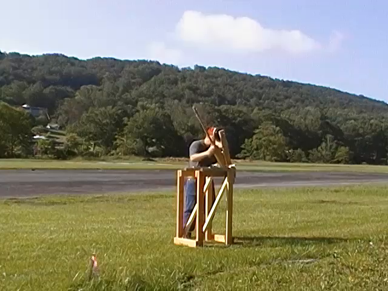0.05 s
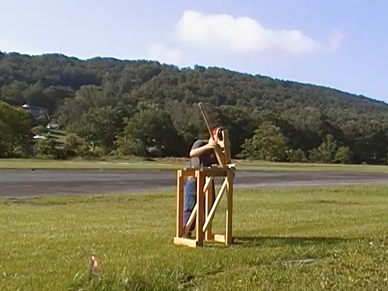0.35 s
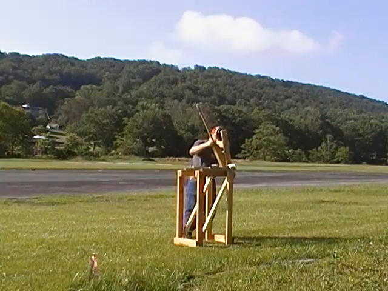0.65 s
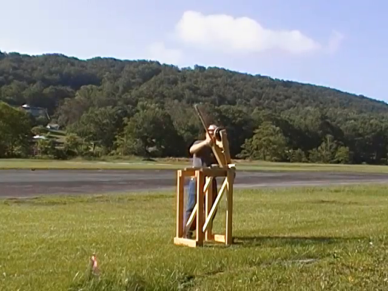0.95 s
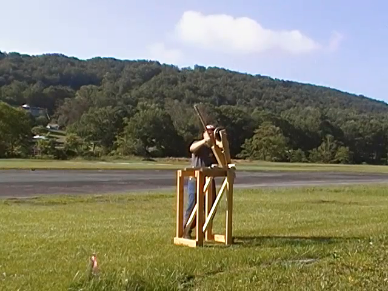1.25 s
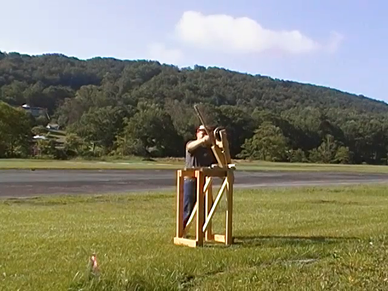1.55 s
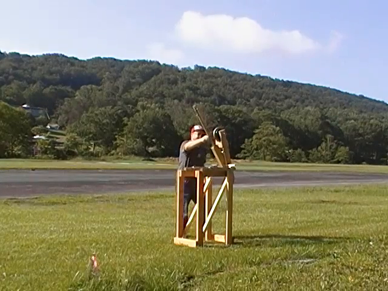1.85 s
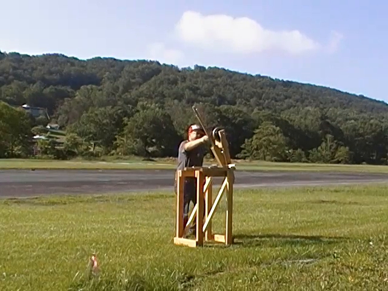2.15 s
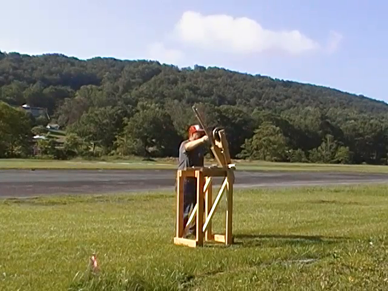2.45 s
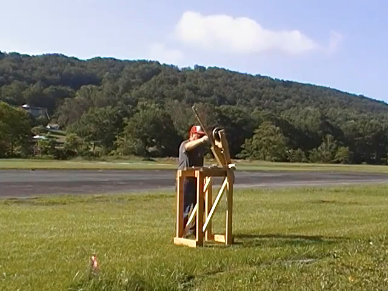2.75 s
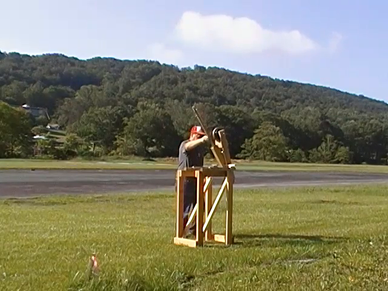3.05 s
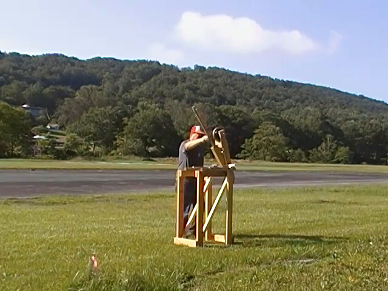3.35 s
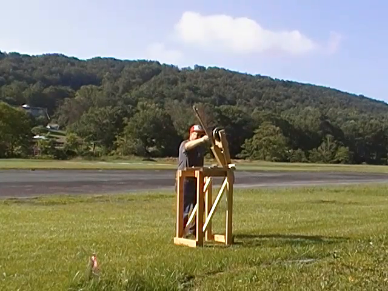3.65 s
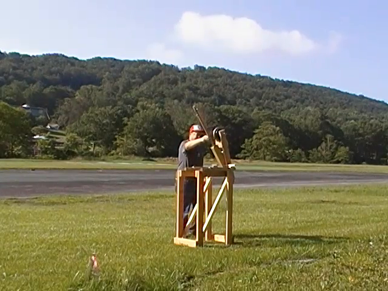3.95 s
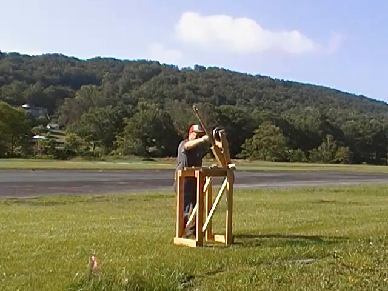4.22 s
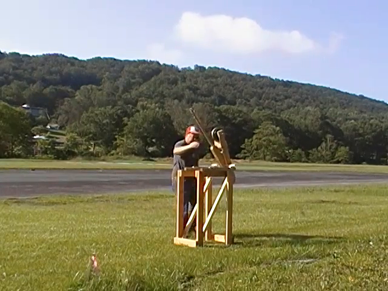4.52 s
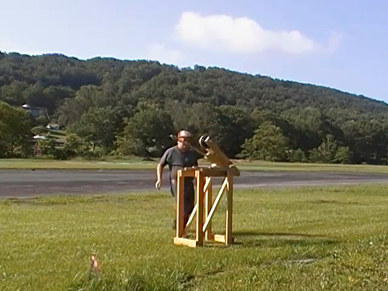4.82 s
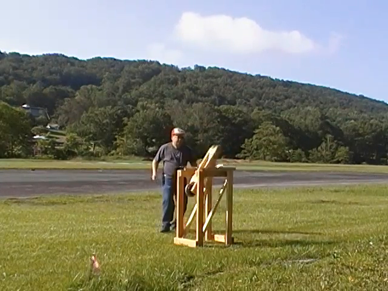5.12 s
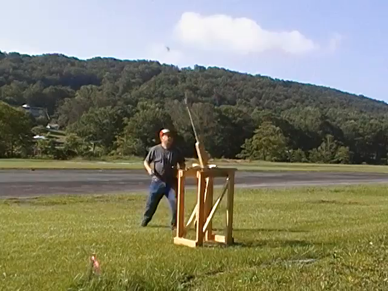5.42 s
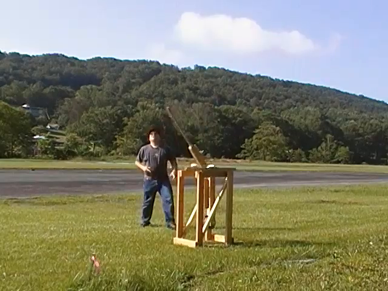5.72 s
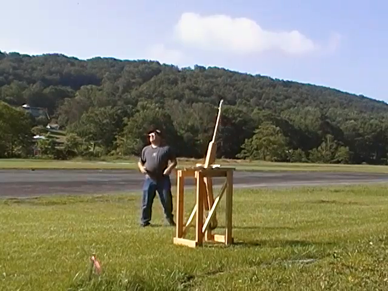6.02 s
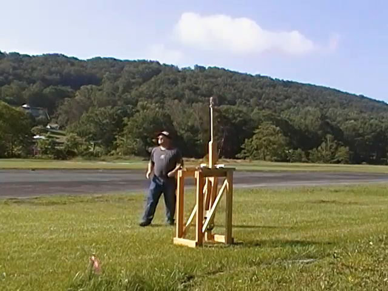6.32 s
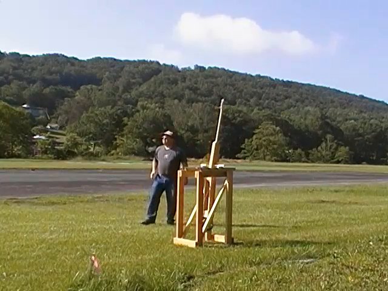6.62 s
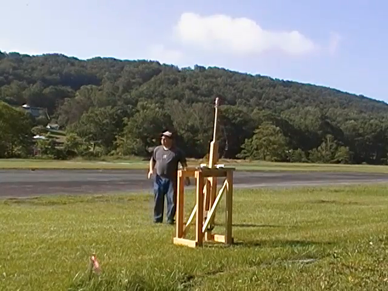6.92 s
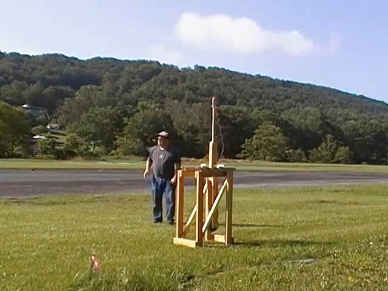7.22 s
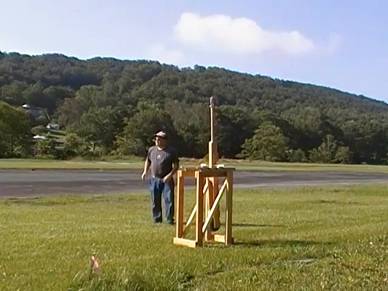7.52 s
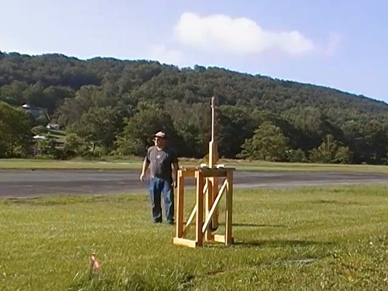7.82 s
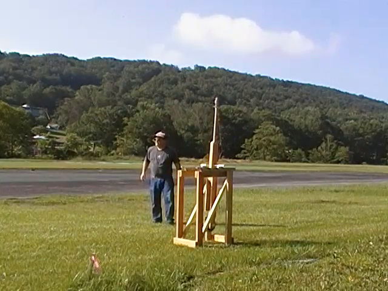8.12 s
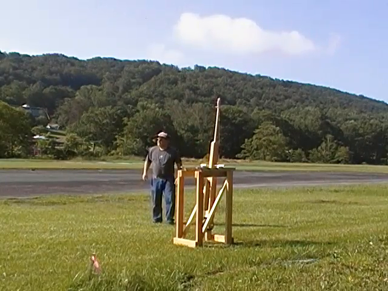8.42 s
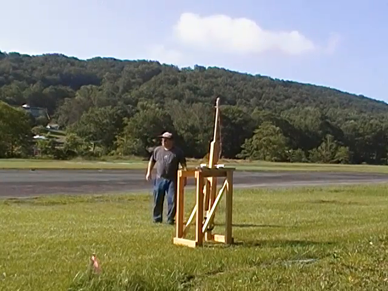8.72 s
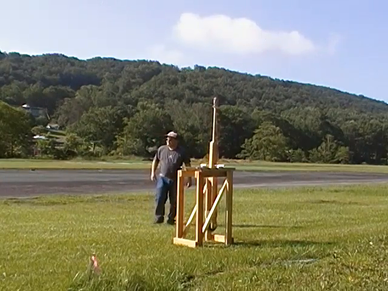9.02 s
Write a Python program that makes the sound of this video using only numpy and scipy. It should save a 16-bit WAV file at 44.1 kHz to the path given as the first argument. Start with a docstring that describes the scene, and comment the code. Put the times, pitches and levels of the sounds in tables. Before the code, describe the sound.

A wooden catapult fires with rattling clacks and ringing steel clinks in an open field, amid faint birds and wind on the microphone.

```python
"""An open field, heard through two microphone ports. Birds call from a wooded hill over quiet air,
then a rising breeze starts to buffet the ports. Just after 5 s a small wooden trebuchet fires: the arm
swings with a rattle, the frame clacks, and the steel counterweight clinks and rings as it bounces to
rest. Meanwhile a distant rush swells; it keeps growing under more gusts and birds to the end."""
import sys
import numpy as np
from scipy import signal
from scipy.fft import rfft, irfft
from scipy.io import wavfile
from scipy.ndimage import uniform_filter1d

SR = 44100
rng = np.random.default_rng(int(sys.argv[2]) if len(sys.argv) > 2 else 0)


def file_out(sig):
    """Save sig as 16-bit WAV at sys.argv[1]."""
    # one column per channel
    cols = np.atleast_2d(sig).T
    # limit, then scale
    lim = np.clip(cols, -1, 1)
    pcm = np.round(lim * 32767).astype(np.int16)
    wavfile.write(sys.argv[1], SR, pcm)


N = 408807
T = np.arange(N) / SR

# still air over the field: (frequency [Hz], relative density [dB])
AIR_COLOUR = [(15, -43), (25, -3), (53, -0.5), (75, -2), (100, 0.5), (164, -0.5), (361, -6), (390, -11.5),
              (481, -13), (625, -15.5), (712, -11.5), (2080, -15), (5930, -28), (10800, -31),
              (13000, -49.5)]
# likeness of that air at the two ports: (frequency [Hz], correlation [ratio])
AIR_LIKENESS = [(60, 0.91), (200, 1), (600, 0.8), (1300, .7), (2700, .3), (5500, 0)]
# whistles from the hill: (time [s], length [s], nominal first pitch [Hz], nominal last pitch [Hz],
# relative level [dB])
WHISTLES = [(0.406, 0.07, 7530, 6540, -54), (0.472, 0.082, 6530, 7460, -48), (1.05, .056, 2010, 2390, -54),
            (1.216, .056, 2230, 1870, -51.5), (2.039, .06, 2270, 3170, -50.5),
            (2.093, 0.17, 4820, 5130, -56.5), (6.94, 0.053, 2070, 1675, -45),
            (7.07, 0.034, 4120, 2410, -47), (7.373, 0.054, 7180, 5200, -53),
            (7.438, 0.0795, 4800, 5130, -54.5), (7.61, .03, 2364, 2340, -48),
            (8.322, .056, 4570, 4700, -61), (8.464, .05, 2070, 1920, -46.5), (9.02, 0.057, 6800, 6250, -54),
            (9.095, .1, 6730, 6140, -50.5)]
# one bird's reedy rising calls: (time [s], length [s], relative level [dB])
CALLS = [(1.752, 0.14, -53.5), (7.547, 0.069, -52.5)]
# overtones of a reedy call: (multiple of the pitch [ratio], relative level [dB])
CALL_OVERTONES = [(2, 3.5), (3, -9), (5, -13)]
# breeze on the microphone: (time [s], level [dB])
BREEZE_LEVELS = [(3.55, -63), (3.93, -39), (4.31, -50.5), (4.35, -34), (4.79, -68), (4.92, -30.5),
                 (5.01, -53), (5.05, -33), (5.73, -42), (5.99, -29), (8.36, -42.5), (9.25, -28),
                 (9.27, -37)]
# gusts that stand out: (time [s], level [dB], left minus right [dB])
PORT_GUSTS = [(2.32, -49, 0), (2.61, -48, 13), (3.02, -41.5, 7), (3.42, -52.5, 16), (6.02, -25, -11),
              (6.49, -26.5, 5.5), (7.11, -32, 1.5), (7.49, -36.5, -15.5), (8.34, -40, 14),
              (8.82, -34, -0.5), (9.12, -25.5, -2)]
# buffeting at the ports: (frequency [Hz], relative density [dB])
BUFFET_COLOUR = [(12, -31.5), (20, -12.5), (43, 1), (87, 1), (149, -4), (316, -18.5), (500, -35),
                 (2000, -63), (8000, -100)]
# rattle of axle and joints: (frequency [Hz], relative density [dB])
RATTLE_COLOUR = [(150, 0.5), (500, -7), (1000, 1.5), (1500, 5.5), (2300, -2.5), (4500, -7.5), (6500, -18),
                 (10500, -13.5), (13000, -36.5)]
# knocks of arm and frame, at relative levels:
# (time [s], hollow thud [dB], wooden body [dB], bright crack [dB], crack t60 [s])
FRAME_KNOCKS = [(5.137, -44, -35.5, -51.5, .05), (5.169, -50, -31, -45.5, 0.045),
                (5.281, -56.5, -37, -35.5, 0.14), (5.320, -31, -23.5, -20, 0.055),
                (5.324, -38.5, -22, -22, .04), (5.332, -31, -21, -25, 0.075), (5.388, -31, -29, -24, 0.048),
                (5.407, -42, -18.5, -25.5, 0.059), (5.447, -55, -37, -30.5, .016),
                (5.495, -44.5, -23.5, -26.5, 0.16), (5.527, -49, -25, -31.5, .12),
                (5.648, -37.5, -27.5, -30, 0.16), (5.724, -42, -28.5, -38, .06),
                (5.744, -35, -23.5, -24.5, 0.062), (5.762, -48, -34, -30.5, .08),
                (5.821, -57, -35, -36.5, 0.14), (5.861, -55, -32.5, -53, .03),
                (6.03, -51, -50, -34.5, 0.025)]
# modes of the wooden frame: (frequency [Hz], relative level [dB], t60 [s])
WOOD_MODES = [(698, -22.5, .04), (876, -5, 0.073), (967, -4, 0.062), (1068, -1.5, 0.0675),
              (1210, -24, 0.046), (1293, -7, 0.036), (1867, -4.5, 0.047), (2640, -20, 0.046),
              (3750, -10.5, 0.017), (4750, -11.5, 0.024)]
# thud under a knock: (frequency [Hz], relative density [dB])
THUD_COLOUR = [(100, -16), (310, -1.5), (580, -4), (900, -9.5), (2000, -38)]
# crack on top of a knock: (frequency [Hz], relative density [dB])
CRACK_COLOUR = [(300, -37), (1000, -18), (2000, 2.5), (3200, 4.5), (4700, 3), (6500, -9.5), (9000, -7.5),
                (11000, -6), (13000, -22)]
# bounces of the counterweight: (time [s], strength [dB], gain of the lowest mode [dB],
# gain of the modes above the second [dB], ring length re the free ring [ratio])
STEEL_STRIKES = [(5.189, -34.5, 9.5, -13, 0.22), (5.214, -35.5, 13.5, -18, 0.47),
                 (5.296, -27.5, 4.5, -8, 0.49), (5.323, -24.5, -1.5, -17, 0.68),
                 (5.501, -5.5, -6.5, -18, 0.38), (5.523, -8, -16.5, -27.5, 1.1),
                 (5.599, -16.5, -10, -32, 0.9), (5.667, -11, -6, -29, 0.57), (5.770, -12, -7, -11.5, 0.85),
                 (5.788, -12.5, -9.5, -15.5, 0.57), (5.826, -21, 2, -29, 0.83),
                 (5.935, -17.5, -8.5, -27.5, 1.05), (6.337, -59, 16, -15, 2)]
# modes of the steel: (frequency [Hz], relative level [dB], free t60 [s], left minus right [dB])
STEEL_MODES = [(1854, -2.5, 0.8, 1), (2972, 0, 0.44, -2), (4264, 0.5, 0.41, -8), (4797, 4.5, 0.12, -9.5),
               (6850, -17, .4, -3.5), (8640, -34.5, .4, 16)]
# click of steel on steel: (frequency [Hz], relative density [dB])
CLICK_COLOUR = [(400, -30), (1400, -5), (2200, 2.5), (2650, -12.5), (3150, 11), (3700, -10),
                (4900, -8), (6000, -43), (12000, -60)]
# rush in the distance: (frequency [Hz], relative density [dB])
FAR_RUSH_COLOUR = [(150, -12), (400, -2), (720, -4), (930, 0.5), (1250, -4), (2200, -13.5), (4000, -30.5),
                   (9000, -56)]


def undb(db):
    """Decibels to gain."""
    return 10 ** (np.asarray(db) / 20)


def unit(x):
    """Scale to rms 1."""
    return x / np.sqrt(np.mean(x ** 2))


def pan(db):
    """Port gains for a level difference, left minus right."""
    return undb(np.array([[db], [-db]]) / 2)


def by_hz(points):
    """Rows (frequency [Hz], value) read at every frequency bin."""
    hz, value = np.transpose(points)
    return np.interp(np.log(np.arange(N // 2 + 1) * SR / N + 1), np.log(hz), value)


def colour(x, points):
    """Causal filter with the given spectrum; white noise keeps its level."""
    cepstrum = irfft(np.log(unit(undb(by_hz(points)))), N)
    cepstrum[1:N // 2] *= 2
    cepstrum[N // 2:] = 0
    return irfft(rfft(x) * np.exp(rfft(cepstrum)), N)


def walk(rate):
    """Smooth random wander at `rate` steps a second, spread near 1."""
    hold = int(SR / rate)
    steps = np.repeat(rng.standard_normal(N // hold + 1), hold)
    return 1.5 * uniform_filter1d(uniform_filter1d(steps, hold), hold)[:N]


def stereo_noise(width, size=N):
    """White noise with a common part and a part that differs between the ports."""
    mid, side = rng.standard_normal((2, size))
    return np.array([mid + width * side, mid - width * side]) / np.hypot(1, width)


def fade(t, t60):
    """Free decay, 60 dB down after t60."""
    return np.exp(-np.log(1000) * t / t60)


def add(out, start, sound):
    """Mix a sound in at a time in seconds."""
    i = max(int(start * SR), 0)
    out[..., i:i + sound.shape[-1]] += sound[..., :N - i]


def scatter(x, t60):
    """Diffuse outdoor reflections, different at each port."""
    t = T[:SR]
    tail = rng.standard_normal((2, SR)) * fade(t, t60) * (1 - np.exp(-t / 0.0057))
    return signal.fftconvolve(x, unit(tail) / np.sqrt(SR), axes=1)[:, :N]


def open_air(level_db=-52, waver_db=0.6):
    """Quiet air all round the microphone, alike at both ports in the bass and wide in the treble."""
    alike = by_hz(AIR_LIKENESS)
    width = np.sqrt((1 - alike) / (1 + alike))
    mid = rng.standard_normal(N)
    side = irfft(rfft(rng.standard_normal(N)) * width, N)
    air = colour(np.array([mid + side, mid - side]), AIR_COLOUR)
    return pan(-1.3) * air / np.std(air.mean(0)) * undb(level_db + waver_db * walk(2.7))


def bird_note(length, first_hz, last_hz, wobble, partials):
    """One note swells and fades while its pitch slides fast, then levels off."""
    progress = np.linspace(0, 1, int(length * SR))
    hz = (last_hz + (first_hz - last_hz) * (1 - progress) ** 1.7) * wobble[:len(progress)]
    phase = 2 * np.pi * np.cumsum(hz) / SR
    swell = 2 * np.sqrt(progress * (1 - progress))
    return swell * sum(undb(db) * np.sin(multiple * phase) for multiple, db in partials)


def birds(direct_db=-5, woods_db=-1.5, call_glide_hz=(1496, 1810)):
    """Raspy whistles and reedy calls from the hill, a little to the right, smeared by the trees."""
    song = np.zeros((2, N))
    wobble, flutter = 1 + 0.02 * walk(700), unit(undb(3 * walk(130)))
    for start, length, first_hz, last_hz, db in WHISTLES:
        whistle = bird_note(length, first_hz, last_hz, wobble[int(start * SR):], partials=[(0.98, 0)])
        add(song, start, undb(db) * whistle)
    for start, length, db in CALLS:
        call = bird_note(length, *call_glide_hz, wobble[int(start * SR):], CALL_OVERTONES)
        add(song, start, undb(db) * call)
    song *= flutter
    return pan(-3.4) * (undb(direct_db) * song + undb(woods_db) * scatter(song, t60=0.41))


def wind(start_s=2.15, eddy_db=7, gust_s=0.029):
    """Right on the microphone, eddies thump each port separately; short gusts ride on the breeze."""
    power = undb(np.interp(T, *np.transpose(BREEZE_LEVELS))) ** 2 * (T > start_s)
    for peak_s, db, side_db in PORT_GUSTS:
        power = power + (undb(db) * pan(side_db)) ** 2 * np.exp(-((T - peak_s) / gust_s) ** 2)
    eddies = np.array([undb(eddy_db * np.tanh(walk(90) - 1) + 1.6 * walk(14)) for _ in range(2)])
    return np.sqrt(power) * unit(eddies * colour(rng.standard_normal((2, N)), BUFFET_COLOUR))


def arm_rattle(release_s=5.135, run_up_s=0.18, swing_end_s=5.82, axle_db=-38.5, sway_db=-51.5):
    """Dense uneven ticks: the axle follows the arm's speed, and each knock shakes the loose joints."""
    since_end = np.maximum(T - swing_end_s, 0)
    speed = np.interp(T, [release_s, release_s + run_up_s], [0.26, 1]) * fade(since_end, t60=0.23)
    sway = undb(sway_db) * fade(since_end, t60=6.6)  # the arm sways slowly to rest
    power = ((undb(axle_db) * speed) ** 2 + sway ** 2) * (T > release_s)
    for start, _, wood_db, _, _ in FRAME_KNOCKS:
        shake = undb(wood_db - 12) * fade(T[:SR], t60=0.21)
        add(power, start, shake ** 2)
    ticks = unit(stereo_noise(0.2) * undb(2.1 * walk(700) + 3.4 * walk(90)))
    return pan(-1.3) * colour(ticks * np.sqrt(power), RATTLE_COLOUR)


def frame_knocks(thud_gain_db=1.5, attack_s=0.00071):
    """Each knock rings the timbers in its own mix and sheds a splintery crack over a hollow thud."""
    body, thuds, cracks, t = np.zeros(N), np.zeros(N), np.zeros((2, N)), T[:SR // 4]
    hz, db, t60 = np.transpose(WOOD_MODES)[:, :, None]
    chance = rng.standard_normal((len(FRAME_KNOCKS), 3, len(WOOD_MODES), 1))
    for (start, thud_db, wood_db, crack_db, crack_t60), (detune, mix, sign) in zip(FRAME_KNOCKS, chance):
        gains = np.sign(sign) * undb(db + 2 * mix)
        modes = gains * np.sin(2 * np.pi * hz * (1 + 0.03 * detune) * t) * fade(t, t60)
        add(body, start, undb(wood_db) * modes.sum(0) * (1 - np.exp(-t / attack_s)))
        add(thuds, start, undb(thud_db) * rng.standard_normal(len(t)) * fade(t, t60=0.1))
        add(cracks, start, undb(crack_db) * stereo_noise(0.58, size=len(t)) * fade(t, crack_t60))
    splinters = unit(undb(2.2 * walk(900)))
    cracks = colour(cracks * splinters, CRACK_COLOUR)
    return body + undb(thud_gain_db) * colour(thuds, THUD_COLOUR) + pan(-1.5) * cracks


def counterweight(contact_s=0.0007, flight_s=0.11, click_db=-6.5, shiver_db=1.3):
    """Steel on steel: each contact chokes the old ring and starts a new one with a click."""
    rings, clicks, t = np.zeros((2, N)), np.zeros((2, N)), T[:SR]
    detunes = 1 + 0.0009 * rng.standard_normal((len(STEEL_STRIKES), len(STEEL_MODES)))
    ends = [strike[0] for strike in STEEL_STRIKES[1:]] + [T[-1]]
    # the steel flies free after a bounce, then its hanger damps all but the lowest mode
    hanger = fade(np.maximum(t - flight_s, 0), t60=0.498)
    for (start, blow_db, low_db, high_db, ring_share), end, detune in zip(STEEL_STRIKES, ends, detunes):
        attack = 1 - np.exp(-t / contact_s)
        choke = np.exp(-np.maximum(t - (end - start), 0) / contact_s)
        shares = [undb(low_db), hanger] + [undb(high_db) * hanger] * (len(STEEL_MODES) - 2)
        for (hz, db, t60, side_db), share, tuning in zip(STEEL_MODES, shares, detune):
            mode = np.sin(2 * np.pi * hz * (start + t * tuning)) * fade(t, t60 * ring_share)
            add(rings, start, pan(side_db) * undb(db + blow_db) * share * mode * attack * choke)
        add(clicks, start, undb(blow_db + click_db) * stereo_noise(0.2, size=SR) * fade(t, t60=0.035))
    return rings * undb(shiver_db * walk(70)) + colour(clicks, CLICK_COLOUR)


def distant_rush(swell_s=5.67, rise_s=0.3, step_db=8.5, growth_db_per_s=1.75, waver_db=0.9):
    """Far off, a rush comes up out of the quiet air in one smooth step and keeps growing."""
    since = T - swell_s
    swell_db = growth_db_per_s * since + step_db * (np.tanh(since / rise_s) - 1) / 2
    rush = colour(stereo_noise(0.4), FAR_RUSH_COLOUR)
    return rush * undb(-54 + swell_db + waver_db * walk(6.3))


def scene():
    """The trebuchet with faint reflections from the field, among birds, wind and air."""
    machine = counterweight() + frame_knocks() + arm_rattle()
    reflections = undb(-17) * scatter(machine, t60=0.6)
    return machine + reflections + birds() + wind() + open_air() + distant_rush()


def record(dry, ceiling=0.88, top_hz=12400):
    """The hardest clang is held under a ceiling, and the top of the treble is rolled off."""
    lowpass = signal.ellip(8, 0.2, 70, top_hz, fs=SR, output="sos")
    return signal.sosfilt(lowpass, np.clip(dry, -ceiling, ceiling))


dry = scene()
out = record(dry)
file_out(out)
```